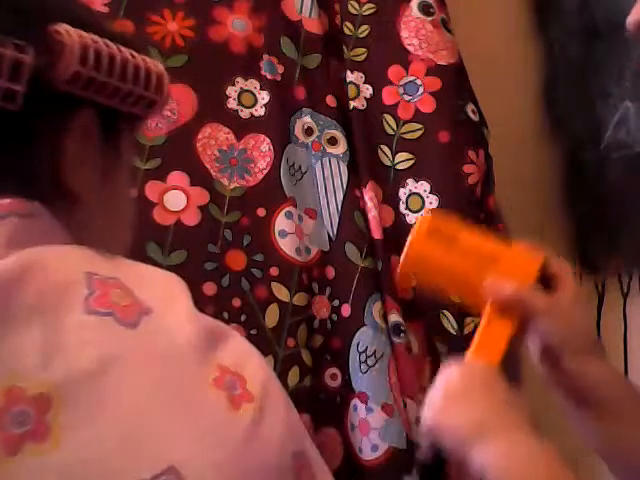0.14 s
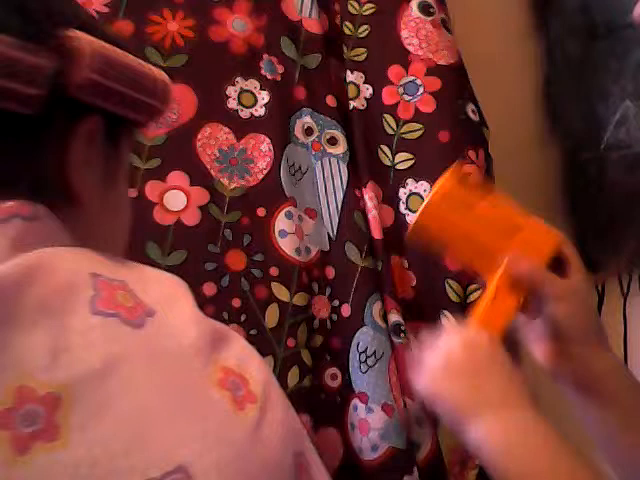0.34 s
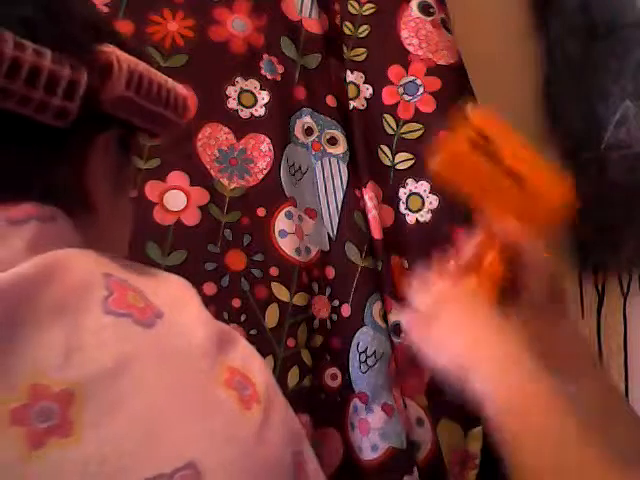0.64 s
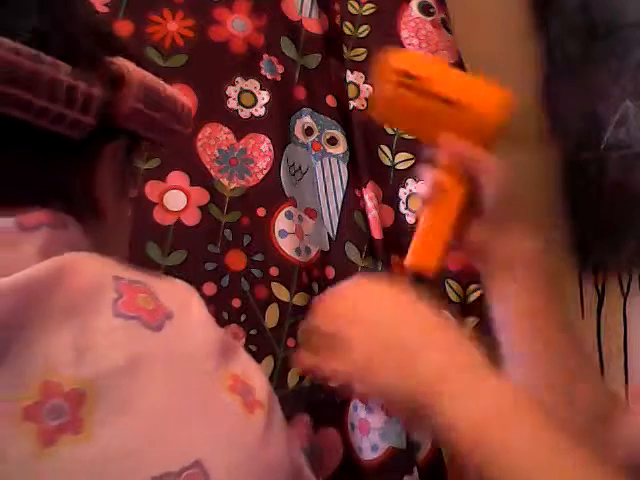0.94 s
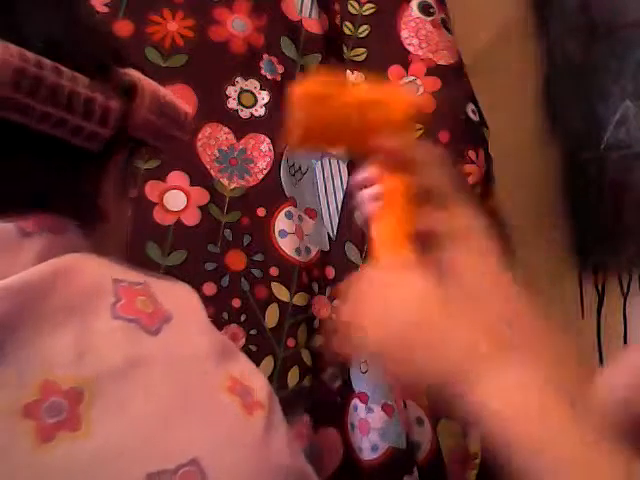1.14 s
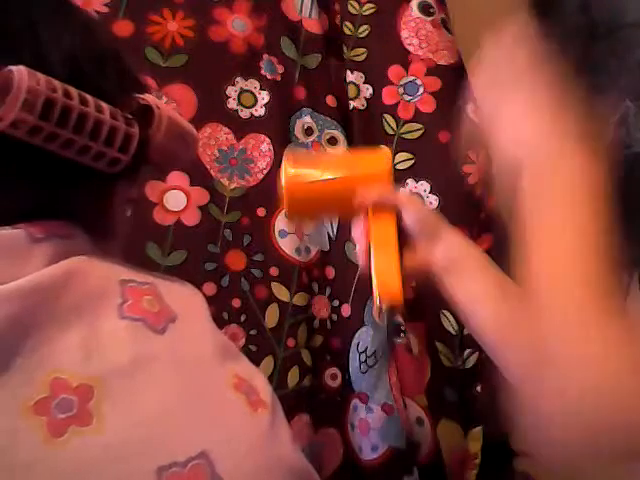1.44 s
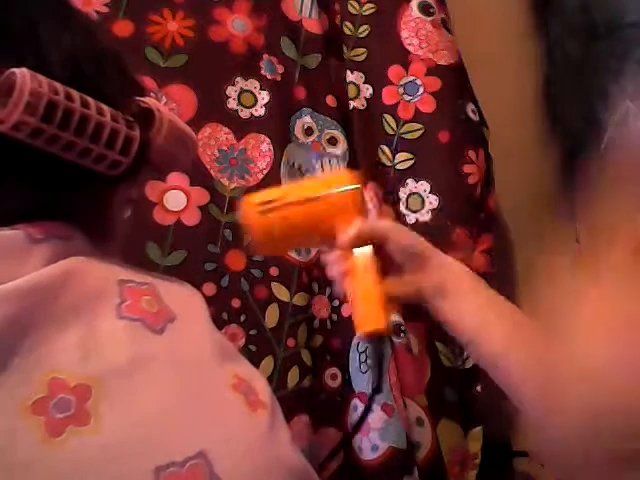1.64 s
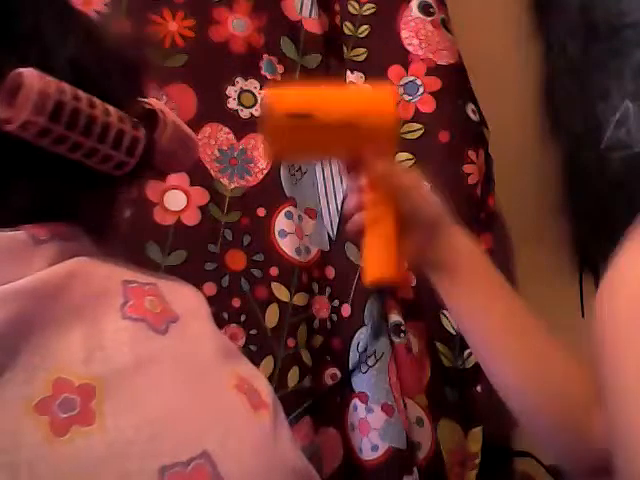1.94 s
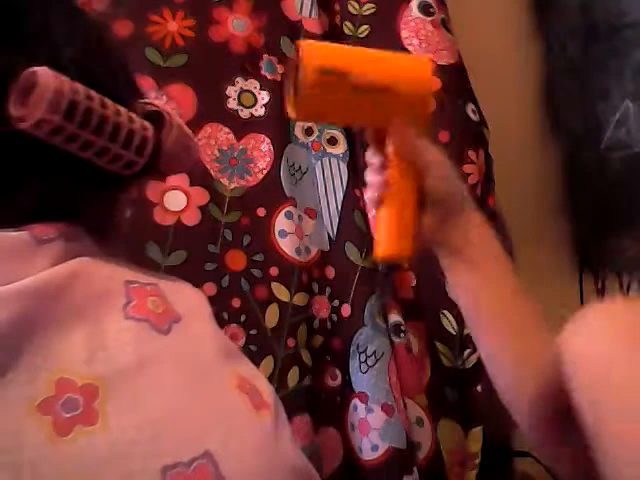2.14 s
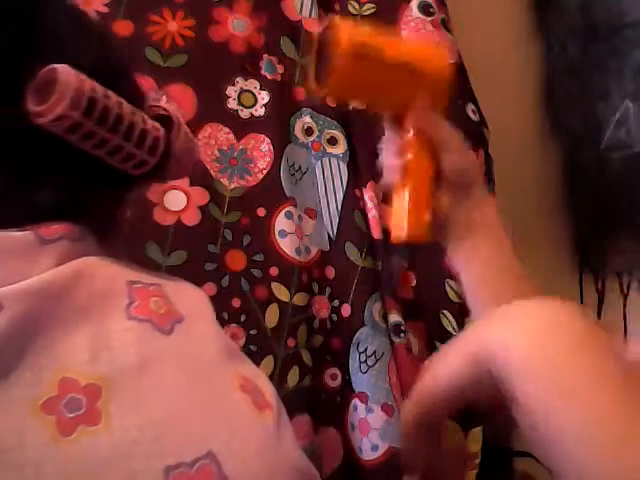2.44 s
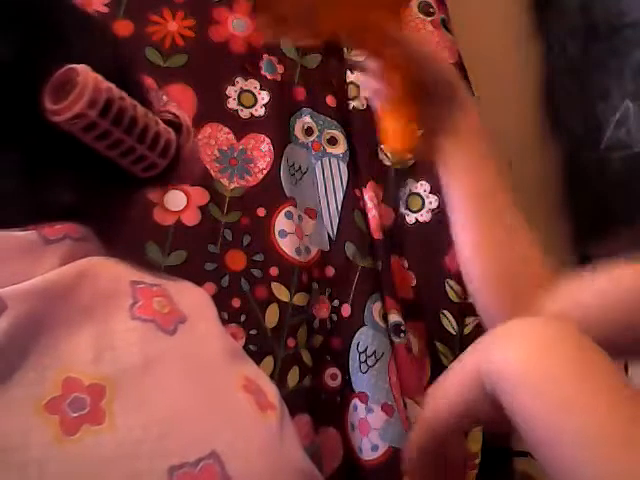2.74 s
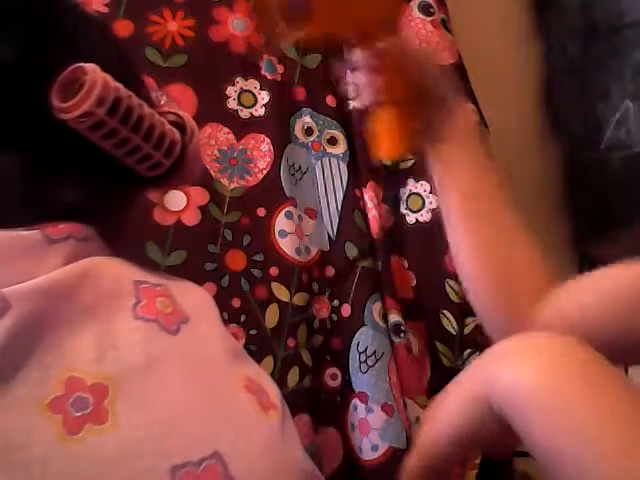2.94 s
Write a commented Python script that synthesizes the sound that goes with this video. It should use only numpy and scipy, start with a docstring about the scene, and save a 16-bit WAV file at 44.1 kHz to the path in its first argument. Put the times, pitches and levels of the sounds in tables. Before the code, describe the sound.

Close up indoors, a hair dryer's whine climbs fast and levels off into a bright, hollow rush of air, its tones swelling and fading with movement, before a few dull thumps in the last half second.

```python
"""A rising motor whine, a hollow barrel tone and a hiss of air: a small hair dryer spins up in a room.
It then blows steadily, waved about by hand. Tones locked to the seven-bladed fan and its shaft swell and
fade, coloured noise makes the air, and noise in drifting or fixed resonances makes barrel and housing.
From about two seconds come handling knocks, very faint at first, then stronger: short low rings with a
scuff and a boom, over a faint rumble. Mono, levels as they reach the microphone; no distance is modelled."""
import sys
import numpy as np
from scipy import signal
from scipy.fft import rfft, irfft, next_fast_len
from scipy.io import wavfile
from scipy.ndimage import map_coordinates

SR = 44100
rng = np.random.default_rng(int(sys.argv[2]) if len(sys.argv) > 2 else 0)


def generate_wav(signal):
    """Clip the signal to [-1, 1] and save it as 16-bit WAV at the path in sys.argv[1]."""
    frames = np.transpose(np.atleast_2d(signal))
    scaled = np.clip(frames, -1, 1) * 32767
    pcm = np.round(scaled).astype(np.int16)
    wavfile.write(sys.argv[1], SR, pcm)


N = 136710  # length in samples, 3.1 s


def amp(db):
    """Decibels to gain."""
    return 10 ** (np.asarray(db) / 20)


def unit(x):
    """Scaled to rms 1."""
    return x / np.sqrt(np.mean(x ** 2) + 1e-20)


def curves(rows):
    """One value per sample for each column after the time."""
    seconds, *columns = np.transpose(rows)
    return [np.interp(np.arange(N) / SR, seconds, column) for column in columns]


def wobble(rate):
    """A smooth random curve with rate knots a second."""
    return map_coordinates(rng.standard_normal(1024), [np.arange(N) * rate / SR], mode="mirror")


def filtered(x, response):
    """x times a response of frequency, padded so that tails do not wrap round."""
    size = next_fast_len(N + SR // 2)
    return irfft(rfft(x, size) * response(np.fft.rfftfreq(size, 1 / SR)), size)[:N]


def noise(spectrum):
    """Noise of rms 1 whose colour is drawn in dB over log frequency."""
    corner_hz, corner_db = np.transpose(spectrum)

    def colour(hz):
        db = np.interp(np.log(hz + 1), np.log(corner_hz), corner_db, left=-120, right=-120)
        return amp(db)

    return unit(filtered(rng.standard_normal(N), colour))


def resonance(hz, width):
    """Noise of rms 1 through two equal resonators in a row, each of the given width in Hz."""
    def two_resonators(f):
        return (1j * f * width / (hz * hz - f * f + 1j * f * width)) ** 2

    return unit(filtered(rng.standard_normal(N), two_resonators))


# Motor shaft speed before jitter. Each row: time in seconds, speed in turns per second.
SHAFT_SPEED = [(0.0, 165.3), (0.05, 199.1), (0.1, 225.6), (0.15, 243.3), (0.2, 257.9), (0.26, 269.0),
               (0.34, 279.3), (0.42, 283.6), (0.5, 286.3), (0.62, 286.4), (0.8, 286.3), (1.02, 285.3),
               (1.3, 286.0), (1.55, 286.9), (1.75, 286.6), (2.1, 286.1), (2.6, 286.6), (3.1, 286.7)]
# Blade whine, shaft order 7, as the dryer turns. Each row: time in seconds, level in dB.
BLADE_WHINE = [(0, -50), (.12, -46), (.2, -37), (.27, -38.5), (.35, -37.5), (.385, -42.5), (.42, -40.5),
               (.455, -35), (.51, -49), (.65, -58), (.71, -42.5), (.87, -47.5), (.98, -43), (1.05, -59),
               (1.18, -58), (1.23, -46), (1.31, -65), (1.47, -49), (1.53, -69), (1.61, -52), (1.69, -42.5),
               (1.83, -44.5), (1.91, -55), (1.98, -45.5), (2.24, -47), (2.37, -60), (2.43, -46),
               (2.5, -47.5), (2.64, -64), (2.69, -43), (2.77, -52.5), (2.84, -46), (2.9, -45),
               (2.96, -53.5), (3.08, -43)]
# Other swelling tones. Each row: time in seconds, level in dB of shaft orders 1 and 4,
# then in dB of the blade overtones, orders 14, 21, 28 and 35.
SHAFT_AND_OVERTONES = [(0.0, -90, -90, -64, -74, -72, -74), (0.12, -68, -80, -70, -60, -64, -70),
                       (0.25, -62, -46, -57, -48, -59, -53), (0.35, -60, -49, -44, -47, -57, -48),
                       (0.46, -55.5, -44, -44.5, -41, -38, -47), (0.6, -59, -52, -46, -44, -47, -48),
                       (0.75, -68, -60, -52, -43.5, -37.5, -54), (0.88, -56, -45, -50, -41, -59, -54),
                       (1.0, -59, -37, -40, -47, -57, -54), (1.13, -59, -44, -48, -61, -44, -50),
                       (1.25, -60.5, -40.5, -66, -42, -39, -50), (1.42, -60, -52, -46.5, -46, -59, -66),
                       (1.58, -67, -60, -50, -51, -42.5, -72), (1.72, -69, -47, -51.5, -52, -43, -49),
                       (1.9, -76, -40, -50, -36, -55, -46), (2.02, -65, -52, -41.5, -48, -41, -54),
                       (2.18, -68, -51, -53, -44.5, -40.5, -54),
                       (2.35, -65.5, -58, -48.5, -43.5, -40.5, -51),
                       (2.5, -61.5, -42.5, -46, -43, -47.5, -51), (2.65, -55, -36, -50, -46, -39, -60),
                       (2.8, -60, -57, -48, -44, -53, -60), (2.95, -60, -40.5, -48, -51, -48, -56),
                       (3.08, -58, -46, -46, -42.5, -50, -49)]
# Tones with a level curve. Each entry: multiple of the shaft speed, the whine first, then the others.
SWELLING_ORDERS = (7, 1, 4, 14, 21, 28, 35)
# Weaker motor tones. Each entry: multiple of the shaft speed.
WEAK_ORDERS = (5, 8, 30, 42)
# Their levels. Each entry: level in dB at top speed.
WEAK_LEVELS = [-52, -65, -53, -61]
SPEED_JITTER = 0.00043  # share of the speed
WEAK_TONE_POWER = 17  # weak tones grow with this power of the speed
SMEAR_RAD, SMEAR_PER_ORDER, SMEAR_RATE = 0.069, 0.016, 26  # phase smear, rise per order, knots per second
SCATTER, SCATTER_PER_ORDER, SCATTER_RATE = 0.13, 0.029, 48  # turbulent part, rise per order, knots per second
SPIN_UP_SCATTER = 3.9  # extra turbulence per share of top speed still missing


def fan():
    """Shaft and blade tones follow the motor speed; turbulence breaks up the higher orders more."""
    speed, = curves(SHAFT_SPEED)
    jittered_speed = speed * (1 + SPEED_JITTER * wobble(12))
    shaft_angle = 2 * np.pi * np.cumsum(jittered_speed) / SR
    speed_share = speed / speed.max()
    effort_db = WEAK_TONE_POWER * 20 * np.log10(speed_share)
    levels = curves(BLADE_WHINE) + curves(SHAFT_AND_OVERTONES) + [db + effort_db for db in WEAK_LEVELS]
    scatter = SCATTER + SPIN_UP_SCATTER * (1 - speed_share)
    out = np.zeros(N)
    for order, db in zip(SWELLING_ORDERS + WEAK_ORDERS, levels):
        smear = (SMEAR_RAD + SMEAR_PER_ORDER * order) * wobble(SMEAR_RATE)
        phase = order * shaft_angle + smear
        # the complex flutter disturbs both strength and phase
        turbulence = (wobble(SCATTER_RATE) + 1j * wobble(SCATTER_RATE)) / np.sqrt(2)
        flutter = 1 + (scatter + SCATTER_PER_ORDER * order) * turbulence
        out += amp(db) * unit(np.real(flutter * np.exp(1j * phase)))
    return out


PATCH_HZ, PATCH_S = 150.6, 0.1727  # knot spacing of the colour shifts in frequency and time


def turning(x, depth_db):
    """Narrow bands swell and fade at random as the dryer is waved about."""
    hz, t, bins = signal.stft(x, SR, nperseg=1024)
    grid = np.meshgrid(hz / PATCH_HZ, t / PATCH_S, indexing="ij")
    field = map_coordinates(rng.standard_normal((256, 64)), grid, mode="mirror")
    patches = unit(amp(depth_db * field))
    return signal.istft(bins * patches, SR, nperseg=1024)[1][:N]


# A hollow that fills in as the dryer turns.
# Each row: time in seconds, share cancelled at the middle of the hollow (0 to 1).
HOLLOW_SHARE = [(0, .9), (.3, 0.66), (.8, .2), (1.3, 0.26), (1.8, 0.71), (2, 0.074), (3.1, .05)]
HOLLOW_HZ, HOLLOW_WIDTH_HZ = 3620, 340


def hollowed(x):
    """One band of the air noise is partly cancelled, depending on where the dryer points."""
    share, = curves(HOLLOW_SHARE)
    band = filtered(x, lambda hz: np.exp(-((hz - HOLLOW_HZ) / HOLLOW_WIDTH_HZ) ** 2))
    return x - np.clip(share, 0, 1) * band


# Air noise before trims and swirl. Each row: time in seconds, level in dB of the low rush,
# of the middle, of the hiss and of the top hiss.
AIR_LEVELS = [(0, -55, -54.5, -59, -53.5), (.08, -51, -49.5, -48.5, -43.5), (.18, -47.5, -46.5, -43, -40),
              (.28, -44, -43, -41, -36.5), (.44, -45, -41, -35.5, -34.5), (.6, -45, -45, -42, -36),
              (.76, -44.5, -43.5, -40, -35), (.9, -44.5, -45, -40, -36.5), (1.12, -45, -46, -38.5, -37.5),
              (1.24, -46, -47, -39.5, -38.5), (1.43, -48, -47, -43.5, -37.5),
              (1.58, -48.5, -47, -41.5, -37), (1.72, -48, -45, -42.5, -36), (1.85, -45.5, -44, -41, -36),
              (2.02, -43.5, -47, -37.5, -36), (2.2, -42, -44, -38.5, -34.5),
              (2.38, -43, -45.5, -39.5, -36.5), (2.52, -44, -44.5, -38.5, -35.5),
              (2.63, -44.5, -45, -40.5, -36), (2.76, -43.5, -45, -40.5, -35),
              (2.86, -43.5, -45.5, -41, -37), (2.97, -42, -46, -39.5, -34.5),
              (3.09, -42.5, -44, -41, -36.5)]
# Colour of the low rush. Each row: frequency in Hz, relative level in dB per Hz.
RUSH_COLOUR = [(100, -79), (170, -27), (240, -18), (330, -12), (450, -9), (600, -4), (850, -0.5),
               (1020, 4.5), (1250, -1), (1450, -3), (2000, -36), (3000, -72)]
# Colour of the middle. Each row: frequency in Hz, relative level in dB per Hz.
MIDDLE_COLOUR = [(1000, -46), (1450, 1.5), (1650, 0), (1780, 2), (1930, 4), (2200, -2.5), (2500, 1.5),
                 (2850, 0), (3120, 2), (3600, 1.5), (3950, -6), (4600, -16), (6000, -50)]
# Colour of the hiss. Each row: frequency in Hz, relative level in dB per Hz.
HISS_COLOUR = [(3000, -36), (3650, -7), (3950, -1), (4400, -5), (4800, -5.5), (5200, -2), (5800, -3.5),
               (6400, -21.5), (8000, -34)]
# Colour of the top hiss. Each row: frequency in Hz, relative level in dB per Hz.
TOP_COLOUR = [(5000, -38), (5900, -2.5), (6500, -2), (7500, -1), (8300, 1), (9400, -2.5), (10200, -8),
              (11300, -12), (12100, -12.5), (12700, -15), (13400, -20.5), (14000, -29)]
RUSH_TRIM_DB, MIDDLE_TRIM_DB = 4.5, 2.1
SWIRL_DB, SWIRL_RATE = 0.74, 20  # turbulence of the air flow: depth, knots per second
MIDDLE_PATCH_DB, HISS_PATCH_DB = 1.5, 2.36  # depth of the colour shifts as the dryer turns


def air():
    """Turbulent air rushes through the barrel and hisses at the grille: four noise bands swirl together."""
    rush_db, middle_db, hiss_db, top_db = curves(AIR_LEVELS)
    swirl_db = SWIRL_DB * wobble(SWIRL_RATE)
    rush = amp(rush_db + RUSH_TRIM_DB + swirl_db) * noise(RUSH_COLOUR)
    middle = amp(middle_db + MIDDLE_TRIM_DB + swirl_db) * noise(MIDDLE_COLOUR)
    hiss = amp(hiss_db + swirl_db) * noise(HISS_COLOUR)
    top = amp(top_db + swirl_db) * noise(TOP_COLOUR)
    shifting = turning(middle, MIDDLE_PATCH_DB) + turning(hiss + top, HISS_PATCH_DB)
    return rush + hollowed(shifting)


# Barrel air resonance, shifting with the grip. Each row: time in seconds, pitch in Hz.
BARREL_PITCH = [(0, 1187), (.3, 1100), (.65, 1179), (1.02, 1152), (1.45, 1225), (1.9, 1198), (2.3, 1208),
                (2.62, 1191), (2.93, 1148), (3.1, 1201)]
# Its short surges, before trim and swirl. Each row: time in seconds, level in dB.
BARREL_SURGES = [(0, -47.5), (.17, -42), (.33, -36), (.49, -37.5), (.55, -43), (.8, -38), (.93, -40.5),
                 (.98, -35.5), (1.06, -39.5), (1.1, -32.5), (1.17, -41), (1.215, -31.5), (1.25, -40.5),
                 (1.38, -40), (1.46, -44.5), (1.53, -36.5), (1.6, -42), (1.7, -37.5), (1.75, -38),
                 (2.1, -37.5), (2.3, -35.5), (2.58, -38.5), (2.615, -30.5), (2.67, -38), (2.75, -45),
                 (2.86, -37.5), (2.95, -43.5), (3.1, -52)]
BARREL_WIDTH_HZ = 184  # of each resonator, at the mean pitch
BARREL_TRIM_DB, BARREL_SWIRL_DB = 0.5, 0.6


def barrel():
    """The air column of the barrel hoots unevenly while its pitch drifts."""
    hz, = curves(BARREL_PITCH)
    db, = curves(BARREL_SURGES)
    steady_hoot = resonance(hz.mean(), BARREL_WIDTH_HZ)
    # reading the hoot faster or slower bends its pitch
    position = np.cumsum(hz / hz.mean())
    hoot = map_coordinates(steady_hoot, [position], mode="mirror")
    swirl = amp(BARREL_SWIRL_DB * wobble(60))
    return amp(db + BARREL_TRIM_DB) * unit(hoot * swirl)


# Resonances of the plastic shell.
# Each row: frequency in Hz, width of each resonator in Hz, level in dB.
SHELL_MODES = [(3075, 520, -61), (4670, 120, -55), (5520, 340, -62.5), (8750, 690, -61)]


def housing():
    """The running motor keeps the plastic shell ringing faintly, at steady levels throughout."""
    return sum(amp(db) * resonance(hz, width) for hz, width, db in SHELL_MODES)


# Colour of the room rumble. Each row: frequency in Hz, relative level in dB per Hz.
RUMBLE_COLOUR = [(10, 23.5), (30, -9), (60, -25), (110, -23), (250, -28), (500, -34)]


def room_rumble():
    """A faint, steady low noise in the room."""
    return amp(-68) * noise(RUMBLE_COLOUR)


# Handling knocks. Each row: start in seconds, level in dB that scales the whole knock, pitch in Hz.
KNOCK_TIMES = [(1.949, -66, 130), (2.349, -64, 130), (2.673, -36.5, 188), (2.707, -42, 152),
               (2.805, -43.5, 201), (2.953, -29.5, 178), (2.98, -41, 125), (3.02, -42, 145)]
# Ringing of a knock. Each row: multiple of its pitch, mean level in dB, time to fall 60 dB in seconds.
RING_MODES = [(.68, -4.5, 0.13), (1, -1.5, 0.11), (1.3, -17, .06)]
# Colour of the dull scuff. Each row: frequency in Hz, relative level in dB per Hz.
SCUFF_COLOUR = [(40, -50), (80, -12), (150, -25), (300, -11), (700, -5), (1200, -35), (3000, -40)]
# Colour of the boom in the room. Each row: frequency in Hz, relative level in dB per Hz.
BOOM_COLOUR = [(50, -26), (90, -5), (200, 6), (320, -19), (600, -40)]
KNOCK_ATTACK_S, RING_SPREAD_DB = 0.0055, 3.7  # time constant; random spread of each ring mode
SCUFF_DB, SCUFF_T60_S = -4, 0.23
BOOM_DB, BOOM_T60_S = -6.5, 0.2
KNOCK_LOW_CUT_HZ = 68  # low cut that keeps the knocks from booming too deep


def handling():
    """Each knock is a short low ring with a dull scuff and a soft boom, all dying away exponentially."""
    out = np.zeros(N)
    for start, db, hz in KNOCK_TIMES:
        t = np.maximum(np.arange(N) / SR - start, 0)
        ring = np.zeros(N)
        for ratio, mode_db, t60 in RING_MODES:
            decay = amp(mode_db + rng.normal(0, RING_SPREAD_DB) - 60 * t / t60)
            ring += decay * np.sin(2 * np.pi * hz * ratio * t)
        scuff = amp(SCUFF_DB - 60 * t / SCUFF_T60_S) * noise(SCUFF_COLOUR)
        boom = amp(BOOM_DB - 60 * t / BOOM_T60_S) * noise(BOOM_COLOUR)
        attack = 1 - np.exp(-t / KNOCK_ATTACK_S)  # silent before the start
        out += amp(db) * attack * (ring + scuff + boom)
    low_cut = signal.butter(6, KNOCK_LOW_CUT_HZ, "highpass", fs=SR, output="sos")
    return signal.sosfilt(low_cut, out)


def scene():
    """The dryer, the room rumble and the knocks, alike in both channels."""
    mono = fan() + air() + barrel() + housing() + room_rumble() + handling()
    return np.tile(mono, (2, 1))


BAND_LIMIT_HZ = 13850


def record(dry):
    """The microphone channel keeps nothing above its band limit."""
    return np.array([filtered(channel, lambda hz: hz < BAND_LIMIT_HZ) for channel in dry])


dry = scene()
out = record(dry)
generate_wav(out)
```